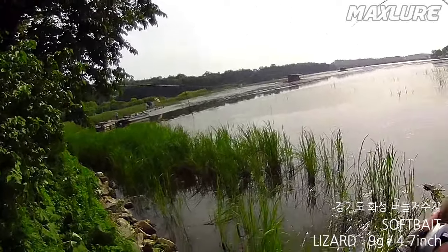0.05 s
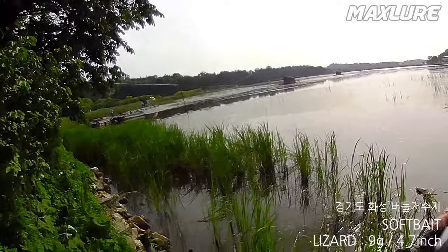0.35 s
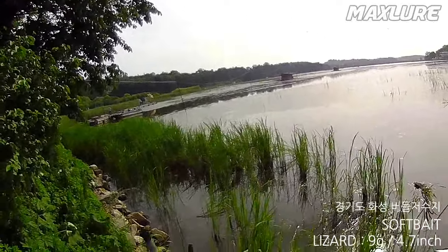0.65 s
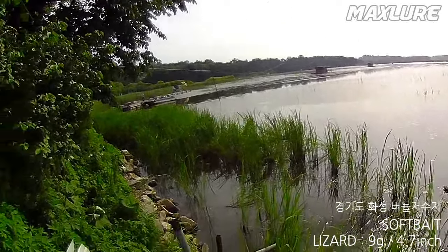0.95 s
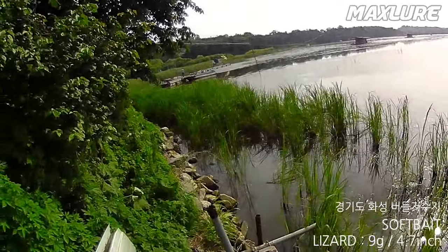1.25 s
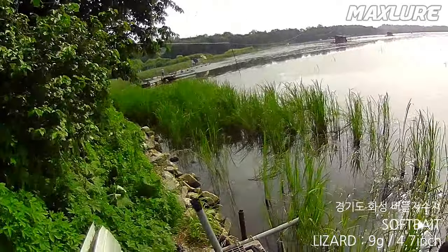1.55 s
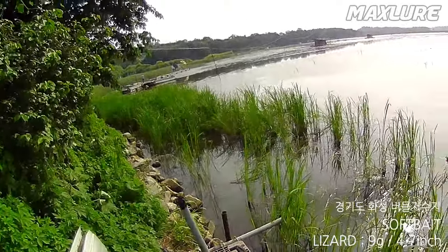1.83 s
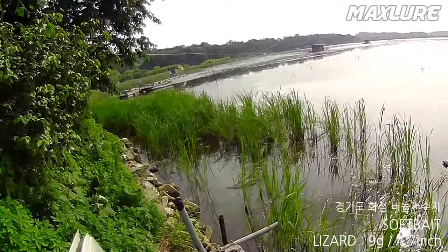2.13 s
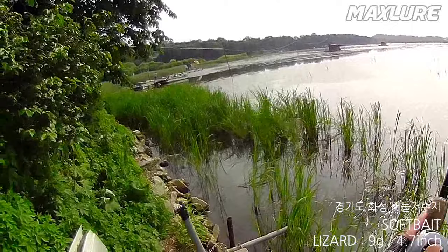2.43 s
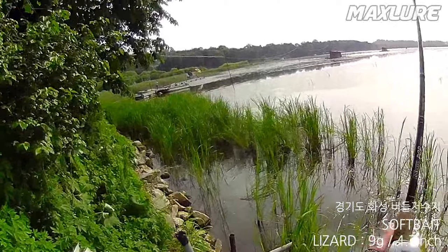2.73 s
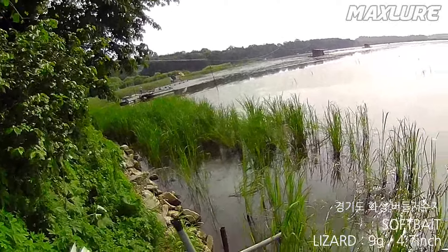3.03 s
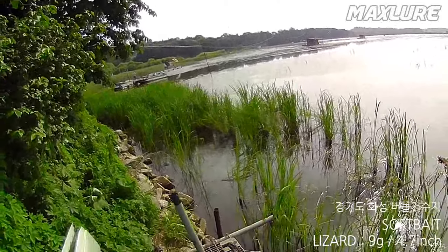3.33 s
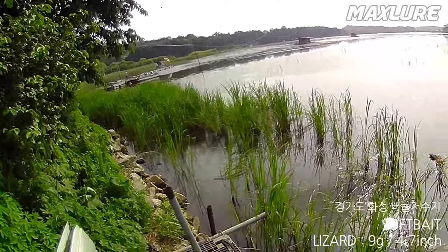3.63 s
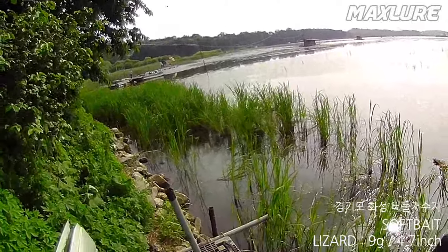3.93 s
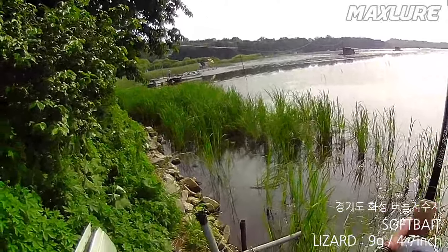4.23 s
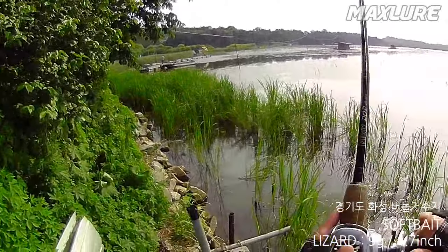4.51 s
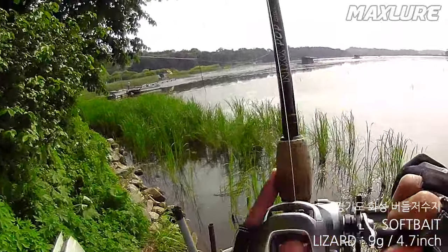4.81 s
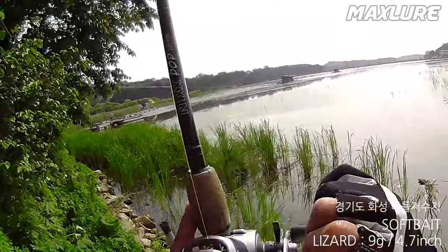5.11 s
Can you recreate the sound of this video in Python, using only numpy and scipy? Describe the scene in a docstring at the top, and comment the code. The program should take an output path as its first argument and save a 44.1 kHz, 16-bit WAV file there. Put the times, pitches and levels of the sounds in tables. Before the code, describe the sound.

A fishing reel is cranked close to the microphone on a quiet lake bank. It whirrs with a quick, fluttering swish while the loose handle gives small, irregular knocks and the gears chatter in spurts. The wet line rasps, ticks and clicks thinly on the rod's rings. The winding is busiest in the first half, then turns lighter. A few faint water plips, open air and hiss lie underneath.

```python
"""A fishing reel whirrs and swishes close by as someone cranks it on a quiet lake bank.
Its side plate flutters, the spool brushes once a turn, and the loose handle gives small knocks.
The line rasps, scrapes and clicks on the guides (the rings along the rod) and sizzles as it is wet.
Each pull on the handle makes the gear teeth chatter, and now and then a hand bumps the rod.
Under it all lie a few plips of water, open air and microphone hiss."""
import sys
import numpy as np
from scipy import signal
from scipy.fft import rfft, irfft
from scipy.io import wavfile
from scipy.ndimage import uniform_filter1d, map_coordinates

SR = 44100
rng = np.random.default_rng(int(sys.argv[2]) if len(sys.argv) > 2 else 0)


def pcm_store(signal):
    """Save signal as 16-bit PCM."""
    levels = np.round(np.clip(np.atleast_2d(signal), -1, 1) * 32767)
    wavfile.write(sys.argv[1], SR, levels.astype(np.int16).T)


N = 232223


def undb(db):
    """Turn decibels (dB) into a number to multiply by."""
    return 10 ** (np.asarray(db) / 20)


def curve(rows):
    """Join (seconds, value) rows with straight lines."""
    return np.interp(np.arange(N) / SR, *np.transpose(rows))


def unit(x):
    """Scale a signal so its average strength (rms) is 1."""
    return x / np.sqrt(np.mean(x ** 2))


def together(*gains):
    """The combined strength of unrelated forces acting at once."""
    return np.sqrt(sum(g ** 2 for g in gains))


def add(track, start, sound):
    """Mix a short sound into the track at a start time in seconds."""
    i = int(np.clip(start * SR, 0, N - 1))
    track[i:i + len(sound)] += sound[:N - i]


def gate(start, length, rise_s=.011, fade_s=.014):
    """A level that rises to 1, holds and dies away."""
    t = np.arange(N) / SR - start
    return np.clip(t / rise_s, 0, 1) * np.exp(-np.clip((t - length) / fade_s, 0, 20))


def walk(rate):
    """Wander smoothly around zero, turning at random `rate` times a second."""
    step = max(int(SR / rate), 1)
    return unit(uniform_filter1d(rng.standard_normal(N)[np.arange(N) // step], step))


def drift(x, share, rate):
    """Let a sound wander by a share of its pitch, as the point of contact moves."""
    return map_coordinates(x, [np.cumsum(1 + share * walk(rate))], mode="mirror")


def contacts(rate, spread_db, smooth):
    """Tiny, uneven, random hits, about `rate` a second, plus some smooth sliding noise."""
    sizes = undb(spread_db * np.clip(rng.standard_normal(N), -2, 2)) * rng.choice([-1, 1], N)
    hits = sizes * (rng.random(N) < rate / SR)
    return unit(hits) + smooth * rng.standard_normal(N)


def response(tone, size=4096):
    """How an object with this tone, given as (Hz, dB) rows, rings after one sharp tap."""
    hz, db = np.transpose(tone)
    bins = np.maximum(np.arange(size // 2 + 1) * SR / size, SR / size)
    gain = undb(np.interp(np.log(bins), np.log(hz), db))
    gain *= np.minimum(bins / hz[0], 1)  # fade out below the first row
    # this fold makes all the ringing come after the tap
    cepstrum = irfft(np.log(gain))
    cepstrum[1:size // 2] *= 2
    cepstrum[size // 2 + 1:] = 0
    return irfft(np.exp(rfft(cepstrum)))


def ring(push, tone):
    """Shake an object that has this tone; the sound comes out at strength 1."""
    return unit(signal.fftconvolve(push, response(tone))[:N])


def tap(body, fade_s):
    """A quickly fading burst of noise rings a body (a response); the peak is 1."""
    t = np.arange(len(body)) / SR
    burst = rng.standard_normal(len(t)) * np.exp(-t / fade_s)
    sound = signal.fftconvolve(burst, body)[:len(t)]
    return sound / np.abs(sound).max()


# The side plate's whirr with no load. Each row: time in seconds, level in dB.
WHIRR_LEVELS = [(0, -47), (.18, -55), (.27, -49), (.45, -46.5), (.9, -50), (1.9, -50), (2.6, -55),
                (3.1, -56), (3.9, -57.5), (4.35, -55), (4.75, -54.5), (5.02, -59), (5.2, -52.5)]
# The tone of the side plate. Each row: frequency in Hz, level in dB.
PLATE_TONE = [(450, -27.5), (750, -16), (1000, -4.5), (1120, 3), (1200, 7), (1330, 0), (1460, 5),
              (1700, -9.5), (2020, -5.5), (2350, -17), (3100, -19), (4200, -32), (8000, -26), (15000, -55)]


def whirr(turns, load, rub):
    """The running gears flutter twice a turn against the reel's side plate, which rings."""
    lag_turns, slip_turns = .034, .04 * walk(8)  # a flutter peaks just after each swish
    flutter = 1 + .7 * np.cos(4 * np.pi * (turns - lag_turns + slip_turns))
    push = contacts(rate=770, spread_db=2, smooth=.58) * undb(walk(54))
    level = together(undb(curve(WHIRR_LEVELS)), undb(-11) * load)
    running = level * flutter * undb(1.8 * walk(18))
    return drift(ring(push, PLATE_TONE), share=.02, rate=20) * together(running, rub)


# How fast the spool spins. Each row: time in seconds, turns per second.
SPOOL_SPEEDS = [(0.0, 10.44), (0.22, 14.09), (0.45, 8.97), (0.7, 9.94), (0.9, 13.01), (1.45, 11.39),
                (1.85, 11.68), (2.25, 13.03), (2.6, 6.19), (2.8, 12.33), (3.15, 9.57), (3.4, 11.7),
                (3.75, 10.59), (4.3, 8.08), (4.9, 10.47), (5.27, 10.53)]


def spool_turns():
    """Count how far the spool has turned at each moment."""
    return -.25 + np.cumsum(curve(SPOOL_SPEEDS)) / SR


# How loud the spool swishes. Each row: time in seconds, level in dB.
SWISH_LEVELS = [(0, -52), (.22, -57), (.34, -50.5), (.64, -56), (.85, -51), (1.1, -51.5), (1.32, -49),
                (1.5, -55), (1.7, -50.5), (1.86, -54), (2.02, -50), (2.1, -56), (2.25, -50), (2.43, -53.5),
                (2.75, -56), (3.05, -60), (3.45, -55), (3.8, -66), (4.5, -65), (5.27, -58)]
# The tone of the swish. Each row: frequency in Hz, level in dB.
SWISH_TONE = [(500, -14), (1000, 4.5), (1300, 10), (1800, -8), (3000, 3.5), (4200, -14), (5800, 2.5),
              (6700, -6.5), (7600, 2.5), (8800, -9.5), (9800, -9.5), (11500, -14), (15000, -32)]


def spool(turns):
    """The spool brushes once in every turn, never twice alike."""
    brush = (.5 + .5 * np.cos(2 * np.pi * turns)) ** 2.5
    push = contacts(rate=2500, spread_db=4, smooth=.7)
    return ring(push, SWISH_TONE) * brush * undb(curve(SWISH_LEVELS) + .27 * walk(28.3))


# The tone of the reel's frame. Each row: frequency in Hz, level in dB.
FRAME_TONE = [(100, -39.5), (240, -28.5), (350, -18.5), (480, -7.5), (650, -2.5), (900, 5), (1200, 0.5),
              (1550, 0.5), (1800, -7.5), (2300, -4.5), (3100, -15), (4200, -22.5), (8000, -49),
              (15000, -42)]
GEARS_IDLE_DB = -59  # turning with no load


def gears(turns, load):
    """Teeth grind and chatter in the frame, a little harder each time a tooth catches."""
    teeth = 12
    catch = 1 + .023 * np.cos(2 * np.pi * (teeth * turns + .091 * walk(30)))
    grind = contacts(rate=520, spread_db=3.5, smooth=.1)
    hollow = chatter(rate=450, spread_db=13, cycles=1.1)
    push = (grind + .22 * hollow) * catch * undb(2.27 * walk(40))
    return ring(push, FRAME_TONE) * together(undb(GEARS_IDLE_DB), load)


def chatter(rate, spread_db, cycles):
    """Each tooth hit rings for a few cycles at its own pitch, the low ones longest."""
    out, t = np.zeros(N), np.arange(1024) / SR
    for when, pitch, size in rng.random((int(rate * N / SR), 3)):
        hz = 480 * 4 ** pitch
        age = hz * t / cycles
        note = age * np.exp(-age) * np.sin(2 * np.pi * hz * t)
        add(out, when * N / SR, undb(spread_db * size ** 3) * note)
    return unit(out)


# The tone of line rasping on a guide. Each row: frequency in Hz, level in dB.
RASP_TONE = [(400, -37), (1200, -7.5), (2000, -10), (2700, -14), (3200, -7), (4150, -24.5), (5000, -6.5),
             (5400, -1.5), (5720, 6), (6050, -1.5), (6500, -13.5), (8000, -25), (12000, -40)]


def line_rasp(load, rub):
    """The line sticks and slips on the guide with a thin, high ring, louder when pulled tight."""
    push = contacts(rate=1500, spread_db=4, smooth=.6) * undb(1.3 * walk(160))
    slack, tight = undb(-62.5), undb(-17) * load
    running = together(slack, tight) * undb(1.8 * walk(22))
    return drift(ring(push, RASP_TONE), share=.008, rate=20) * together(running, rub)


# The tones of the open air, the hiss both microphones share and the hiss each has alone.
# Each row: frequency in Hz, level in dB.
AIR_TONE = [(25, -51), (60, -36), (95, -47), (120, -15), (145, -23.5), (200, -16.5), (250, -16),
            (420, -3.5), (800, 3.5), (1250, 3.5), (2000, -4), (3000, -12.5), (4200, -27.5), (15000, -21.5)]
SHARED_HISS_TONE = [(30, -45), (1000, 13.5), (4200, -10), (5700, 3), (6800, 0), (9000, -1), (11500, -4),
                    (13500, -10), (15500, -36)]
OWN_HISS_TONE = [(25, -7.5), (80, -4.5), (115, 5.5), (160, -8), (400, 3.5), (2000, 8), (4200, -8.5),
                 (6000, -3.5), (11000, -7), (15500, -12)]


def air_and_hiss():
    """Faint open air, alike on both sides, and the hiss of the two microphones."""
    air = ring(rng.standard_normal(N), AIR_TONE) * undb(-51.5 + walk(3.64))
    shared = ring(rng.standard_normal(N), SHARED_HISS_TONE) * undb(-61)
    own = np.array([ring(rng.standard_normal(N), OWN_HISS_TONE) for _ in range(2)]) * undb(-59.5)
    return air + shared + own


# Knocks of the loose handle. Each row: start in seconds, level in dB, pitch in Hz,
# tick strength in dB (higher is sharper), seconds for the note to fade by 60 dB.
HANDLE_KNOCKS = [(.029, -37, 1180, -30, 0.025), (0.078, -26, 1360, -22, 0.029),
                 (0.110, -28, 1260, -25, 0.02), (.415, -32, 870, -30, 0.011),
                 (.437, -32, 1240, -6.5, 0.0087), (.467, -29, 1390, -32, 0.017),
                 (0.493, -31, 1260, -34, 0.018), (0.5558, -14.5, 920, -47, 0.015),
                 (.562, -15.5, 795, -46, 0.013), (0.569, -21, 1040, -44, 0.011),
                 (0.575, -18.5, 680, -45, 0.0069), (.616, -34, 905, -35, 0.014),
                 (0.63, -28, 1100, -35, .012), (0.6835, -18, 900, -33, 0.011),
                 (0.763, -24, 1160, -18, 0.02), (0.779, -26, 1210, -28, 0.015),
                 (0.826, -31, 1290, -29, 0.0086), (0.851, -29, 1420, -32, 0.006),
                 (0.8855, -24.5, 1370, -39, 0.032), (0.989, -22.5, 1100, -19, 0.014),
                 (1.016, -22.5, 927, -34, 0.025), (1.025, -22.5, 1890, -37, 0.0095),
                 (1.194, -26.5, 820, -12.5, 0.021), (1.205, -24, 910, -17, 0.013),
                 (1.22, -26, 1100, -32, .01), (1.328, -15, 1320, -28, 0.0085),
                 (1.401, -25.5, 737, -37, 0.027), (1.477, -28, 990, -14.5, 0.0086),
                 (1.501, -22, 1600, -29, 0.0088), (1.556, -26, 1120, -36, 0.006),
                 (1.577, -20, 1330, -17.5, 0.0076), (1.593, -24.5, 630, -24, 0.0092),
                 (1.642, -21.5, 1670, -27, 0.01), (1.653, -23, 1200, -32, .01),
                 (1.691, -22.5, 880, -33, 0.02), (1.699, -15.5, 1170, -41, 0.019),
                 (1.721, -21.5, 940, -38, 0.054), (1.743, -19.5, 1000, -28, 0.0082),
                 (1.81, -25, 914, -30, 0.024), (1.847, -30, 1380, -18, 0.004),
                 (1.897, -27.5, 1480, -25, 0.026), (2.085, -12.5, 1180, -52, 0.0078),
                 (2.119, -16.5, 1340, -37, 0.0053), (2.127, -17, 1100, -41, 0.0045),
                 (2.161, -22, 1380, -40, 0.0091), (2.19, -24, 875, -42, 0.025),
                 (2.203, -16.5, 665, -52, 0.024), (2.265, -23, 960, -37, 0.014),
                 (2.279, -27, 790, -37, 0.024), (2.351, -28.5, 2400, -28, 0.0052),
                 (2.363, -23, 860, -27, 0.02), (2.546, -32, 1280, -9, 0.0083),
                 (2.572, -29.5, 1210, -31, .012), (2.672, -19.5, 850, -27, 0.014),
                 (2.74, -22.5, 1300, -34, .012), (2.781, -20.5, 1250, -39, 0.015),
                 (2.793, -20, 1280, -29, 0.0041), (2.87, -28, 1300, -32, 0.014),
                 (3.038, -26, 1190, -34, 0.012), (3.245, -27, 1180, -35, 0.015),
                 (3.357, -25, 1650, -36, 0.0081), (3.37, -28, 1010, -35, 0.013),
                 (3.414, -26, 1170, -23, 0.017), (3.451, -22, 710, -18, 0.0072),
                 (3.457, -15.5, 2170, -35, 0.0034), (3.468, -26, 937, -30, 0.077),
                 (3.485, -25, 1140, -34, 0.011), (3.505, -26, 1090, -34, 0.011),
                 (3.538, -29, 2480, -28, 0.013), (3.558, -23.5, 980, -36, 0.015),
                 (3.657, -28, 1180, -35, 0.01), (3.77, -24, 960, -35, 0.006),
                 (3.866, -26.5, 1460, -31, 0.0077), (3.929, -32, 1500, -35, .008),
                 (3.952, -25.5, 1590, -35, 0.0082), (4.09, -20, 850, -17, 0.017),
                 (4.155, -24.5, 793, -12, 0.019), (4.171, -26, 1360, -29, 0.0088),
                 (4.456, -24.5, 1300, -30, 0.01), (4.492, -26, 1180, -18.5, 0.013),
                 (4.541, -28.5, 1500, -35, 0.0073), (4.552, -30.5, 3520, -12, 0.0045),
                 (4.6317, -24.5, 810, -16, 0.011), (4.6652, -25.5, 815, -16, 0.0079),
                 (4.686, -28.5, 791, -14.5, .013), (4.79, -28.5, 1330, -23, .015),
                 (4.8128, -25, 890, -11.5, 0.0049), (4.84, -25, 1534, -31, 0.023)]
# The tone of a knock's tick. Each row: frequency in Hz, level in dB.
TICK_TONE = [(600, -26.5), (1500, 15.5), (3000, 1.5), (4100, -11), (5000, -2), (5750, 9), (6600, -2),
             (7800, -20), (10000, -12), (15000, -29)]


def knocks(load):
    """Each knock of the handle gives a sharp tick, a short note from the housing and a little rattle."""
    out, t = np.zeros(N), np.arange(2048) / SR
    tick_body, frame_body = response(TICK_TONE)[:len(t)], response(FRAME_TONE)[:len(t)]
    for start, db, hz, tick_db, ring_s in HANDLE_KNOCKS + random_knocks(load):
        rise = 1 - np.exp(-2 * t * hz)
        fade = undb(-60 * t / ring_s)
        note = np.sin(2 * np.pi * hz * t) * rise * fade
        note /= np.abs(note).max()
        tick = undb(tick_db + 10) * tap(tick_body, fade_s=.0006)
        rattle = tap(frame_body, fade_s=.002)
        add(out, start + .00078, undb(db) * (.51 * note + .17 * rattle + tick))
    # the small housing gives off no bass
    return signal.sosfilt(signal.butter(4, 420, "high", fs=SR, output="sos"), out)


def random_knocks(load):
    """Extra rows of light knocks at random moments, harder when the gears are under load."""
    per_second, tick_db, ring_s = 16, -35, .008
    gear_db = 20 * np.log10(together(undb(GEARS_IDLE_DB), load))
    rows = []
    for when, size, pitch in rng.uniform(-1, 1, (int(per_second * N / SR), 3)):
        i = int((when + 1) / 2 * N)
        db = gear_db[i] + 8 + 5.5 * size
        hz = 1200 * 2 ** (.7 * pitch)
        rows.append((i / SR, db, hz, tick_db, ring_s))
    return rows


# Scrapes of the line. Each row: middle in seconds, about half the length in seconds, level in dB.
LINE_SCRAPES = [(0.06, 0.0064, -50), (0.117, 0.0096, -39.5), (0.346, 0.0077, -50), (0.435, 0.002, -39.5),
                (0.553, 0.0034, -40), (0.764, 0.0022, -38.5), (1.246, .003, -46), (1.578, 0.0073, -50),
                (2.685, .008, -53), (2.776, 0.013, -43), (2.822, .007, -51), (4.085, 0.0059, -49),
                (4.446, 0.0049, -54), (4.851, 0.007, -52), (5.136, 0.0053, -51)]
# The tone of a scrape. Each row: frequency in Hz, level in dB.
SCRAPE_TONE = [(400, -18), (750, 2), (1300, -49), (1750, 3.5), (2050, 8.5), (2800, -11.5), (4200, -41),
               (5800, -4), (6700, -7.5), (7700, -2.5), (10000, -17.5), (15000, -36)]


def scrapes():
    """The line snatches, making a short, bright run of tiny slips."""
    t = np.arange(N) / SR
    pressure = sum(undb(db) * np.exp(-.5 * ((t - middle) / half) ** 2)
                   for middle, half, db in LINE_SCRAPES)
    return ring(contacts(rate=1500, spread_db=4.5, smooth=.4), SCRAPE_TONE) * pressure


# Rubs of the incoming line. Each row: start in seconds, length in seconds,
# level of the guide's rasp in dB, level of the side plate's buzz in dB.
LINE_RUBS = [(0.095, 0.033, -44, -37), (0.322, 0.027, -61, -63), (0.396, 0.059, -46.5, -64),
             (0.527, 0.055, -53.5, -45), (0.617, 0.035, -47, -58), (0.75, 0.03, -46, -48),
             (0.843, 0.067, -57, -45), (1.203, 0.17, -57.5, -51), (1.556, 0.1, -50, -45),
             (1.677, 0.071, -61, -43.5), (2.033, 0.027, -48.5, -66), (2.365, 0.14, -55.5, -47.5),
             (2.656, 0.094, -53, -44.5), (2.755, 0.03, -42.5, -37), (2.807, 0.025, -49.5, -42.5),
             (2.856, 0.015, -49.5, -44), (2.944, 0.026, -56, -49.5), (2.976, 0.06, -50.5, -49),
             (3.128, 0.027, -57.5, -65), (3.203, 0.026, -48, -45), (3.292, 0.051, -47, -48),
             (3.424, 0.053, -47, -47), (3.477, 0.038, -53, -43.5), (3.535, 0.045, -50.5, -47.5),
             (3.604, 0.011, -47.5, -58), (3.671, 0.02, -48.5, -60), (3.76, 0.065, -51.5, -57),
             (4.018, 0.023, -54.5, -39.5), (4.061, 0.029, -51.5, -41), (4.296, .035, -54.5, -62),
             (4.431, 0.028, -54, -44.5), (4.608, 0.056, -55, -47), (4.816, 0.078, -57, -47),
             (5.068, 0.072, -60, -55), (5.172, 0.034, -59, -51), (5.226, 0.024, -57, -44.5)]


def rubbing():
    """How hard the rubbing line shakes the guide and the side plate at each moment."""
    guide, plate = np.zeros(N), np.zeros(N)
    for start, length, guide_db, plate_db in LINE_RUBS:
        touch = gate(start, length)
        guide += undb(guide_db) * touch
        plate += undb(plate_db) * touch
    return guide, plate


# Ticks of the wet line. Each row: start in seconds, peak level in dB.
WET_TICKS = [(.101, -43), (.964, -48), (.990, -44), (1.466, -48), (1.486, -43), (2.107, -47), (2.222, -44),
             (2.325, -42), (2.477, -47), (2.651, -42), (2.734, -44), (2.749, -41), (2.826, -45),
             (4.221, -48), (4.328, -48), (4.357, -46), (4.49, -47), (4.553, -48)]
# The tone of a guide ring, with two high notes. Each row: frequency in Hz, level in dB.
GUIDE_TONE = [(7000, -24), (9000, -7), (9500, 1), (10100, -3), (11400, -3), (11850, -.5), (12400, -6),
              (15000, -17)]


def wet_ticks():
    """Wet line flicks off the guides with tiny, very high ticks."""
    out, guide = np.zeros(N), response(GUIDE_TONE)[:1024]
    for start, db in WET_TICKS:
        add(out, start, undb(db) * tap(guide, fade_s=.0015))
    return out


# Plips of water at the bank. Each row: start in seconds, pitch in Hz, peak level in dB.
WATER_PLIPS = [(.183, 730, -45), (.412, 870, -47), (.68, 500, -40), (.745, 435, -46.5), (1.176, 552, -37),
               (1.298, 590, -38.5), (1.376, 783, -36), (2.132, 501, -38), (2.352, 490, -40),
               (2.525, 693, -40.5), (3.495, 843, -38), (3.517, 416, -45.5), (3.75, 876, -42),
               (3.80, 920, -38.5), (3.832, 615, -39.5)]


def plips():
    """Small bubbles ring briefly and rise a little in pitch."""
    out, t = np.zeros(N), np.arange(4096) / SR
    age = t / .0048  # loudest after 4.8 milliseconds
    for start, hz, db in WATER_PLIPS:
        note = np.sin(2 * np.pi * hz * (t + 1.06 * t ** 2))
        add(out, start, undb(db) * age * np.exp(1 - age) * note)
    return out


# Flicks of the line on the guide. Each row: start in seconds, peak level in dB.
LINE_FLICKS = [(.309, -38), (.496, -40), (.615, -41), (.639, -37), (.6845, -35), (.728, -42), (.765, -31),
               (.784, -38), (.826, -42), (.9, -42), (1.04, -44), (1.502, -31), (1.643, -34), (2.119, -42),
               (2.378, -41), (2.3925, -31.5), (2.406, -42), (2.425, -41), (3.46, -35), (3.691, -41),
               (4.0895, -33), (4.1555, -30.5), (4.172, -45), (4.318, -42), (4.5525, -35), (4.632, -34),
               (4.665, -33)]
# The tone of a flick. Each row: frequency in Hz, level in dB.
FLICK_TONE = [(1000, -28), (2400, -22), (3300, -11), (4200, -32), (5100, -2), (5700, 3), (6200, -3),
              (6900, -14), (10000, -26), (15000, -48)]


def flicks():
    """The line jumps on the guide, which answers with a thin, dry click."""
    out, guide = np.zeros(N), response(FLICK_TONE)[:1024]
    for start, db in LINE_FLICKS:
        add(out, start, undb(db) * tap(guide, fade_s=.0006))
    return out


# Pulls on the handle. Each row: start in seconds, length in seconds, level in dB.
HANDLE_PULLS = [(0.583, 0.2, -43), (0.757, 0.38, -42.5), (1.154, 0.29, -40.5), (1.467, 0.22, -39.5),
                (1.684, 0.069, -40), (1.772, 0.048, -47), (2.086, 0.3, -41), (2.4, 0.18, -50),
                (3, 0.067, -45), (3.204, 0.16, -48.5), (3.349, 0.054, -42.5), (3.445, 0.024, -36.5),
                (3.484, 0.048, -44), (3.532, 0.056, -44.5), (3.598, 0.27, -48.5), (4.191, 0.063, -49.5),
                (4.579, 0.019, -42), (5.225, .045, -52)]


def gear_load():
    """How hard the gears are pushed: each pull takes hold quickly, sags a little and lets go."""
    t, sag_db_per_s = np.arange(N) / SR, 5
    return sum(undb(db - sag_db_per_s * (t - start)) * gate(start, length, rise_s=.006, fade_s=.016)
               for start, length, db in HANDLE_PULLS)


# Bumps of the hand on the rod. Each row: start in seconds, pitch in Hz, peak level in dB.
HAND_BUMPS = [(.742, 290, -57), (1.565, 220, -60), (3.13, 175, -62), (4.232, 290, -58), (4.59, 220, -62)]


def bumps():
    """The soft hand gives the rod a dull note that dies quickly."""
    out, t = np.zeros(N), np.arange(4096) / SR
    age = t / .004  # loudest after 4 milliseconds
    for start, hz, db in HAND_BUMPS:
        add(out, start, undb(db) * age * np.exp(1 - age) * np.sin(2 * np.pi * hz * t))
    return out


# Spells of sizzling wet line. Each row: start in seconds, length in seconds, level in dB.
WET_SIZZLES = [(1.45, 0.042, -63), (2.092, 0.51, -72), (2.64, .21, -68.5), (4.017, 0.53, -72)]


def sizzle():
    """Wet line sheds a fine spray of tiny pings on the guide rings."""
    spray = contacts(rate=130, spread_db=4, smooth=0)
    level = sum(undb(db) * gate(start, length) for start, length, db in WET_SIZZLES)
    return ring(spray, GUIDE_TONE) * level


def scene():
    """The reel sits just in front of two microphones and sounds nearly the same in both."""
    turns, load = spool_turns(), gear_load()
    guide_rub, plate_rub = rubbing()
    reel = gears(turns, load) + whirr(turns, load, plate_rub) + spool(turns) + knocks(load) + bumps()
    tackle = reel + line_rasp(load, guide_rub) + scrapes() + flicks() + wet_ticks() + sizzle()
    # a weak, bright echo off the arm and rod reaches the two sides differently
    bounce = signal.lfilter(*signal.butter(1, 2000, "high", fs=SR), tackle)
    echo = undb(-27) * np.concatenate([np.zeros(SR // 700), bounce])[:N]
    return np.array([tackle + echo, tackle - echo]) + plips() + air_and_hiss()


def record(dry):
    """The microphones lose a narrow band of middle pitches and the very highest treble."""
    notch_hz, top_hz = 1000, 15800
    notched = signal.lfilter(*signal.iirnotch(notch_hz, 24, fs=SR), dry)
    return signal.sosfilt(signal.ellip(10, .2, 70, top_hz, fs=SR, output="sos"), notched)


dry = scene()
out = record(dry)
pcm_store(out)
```